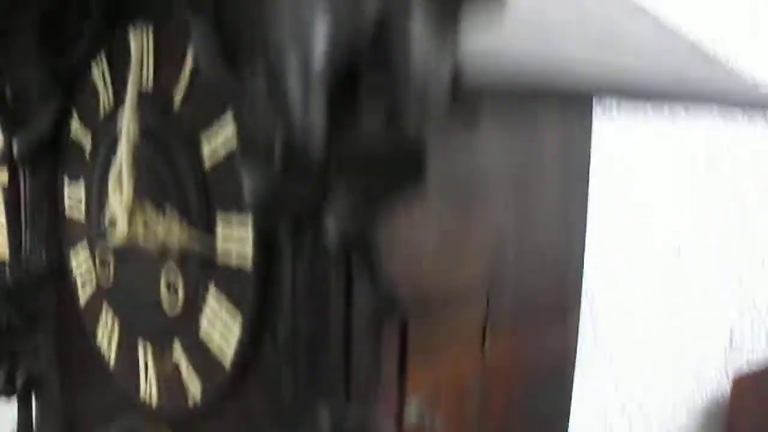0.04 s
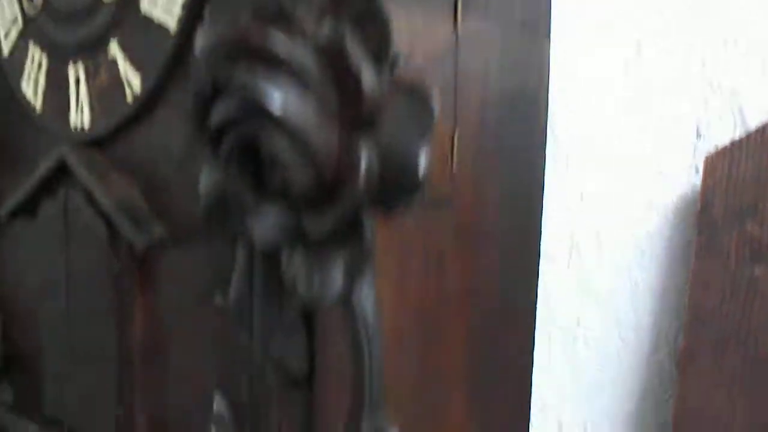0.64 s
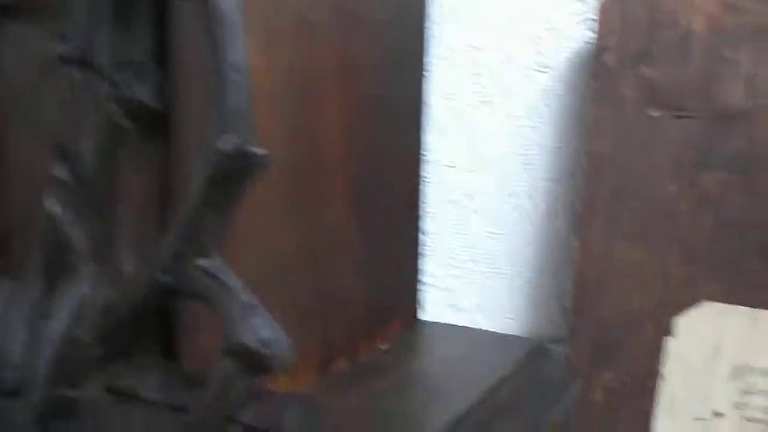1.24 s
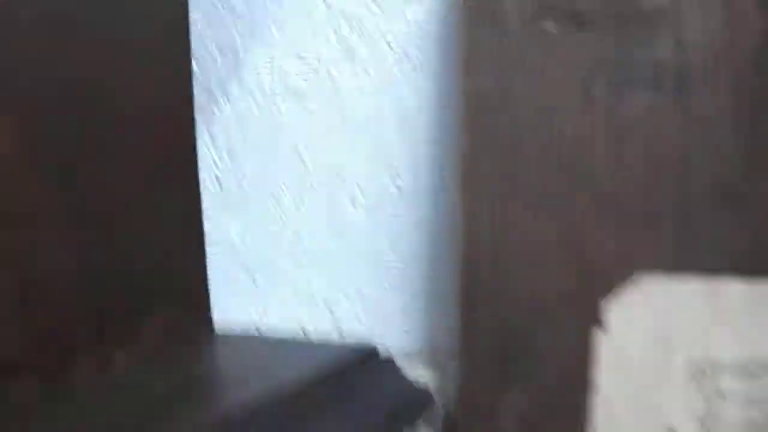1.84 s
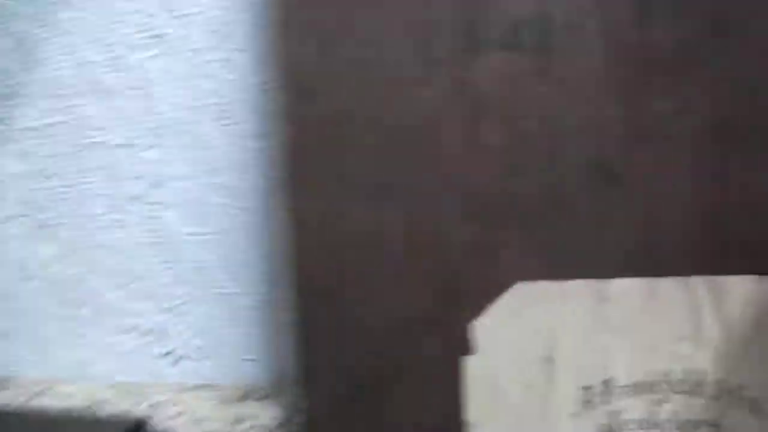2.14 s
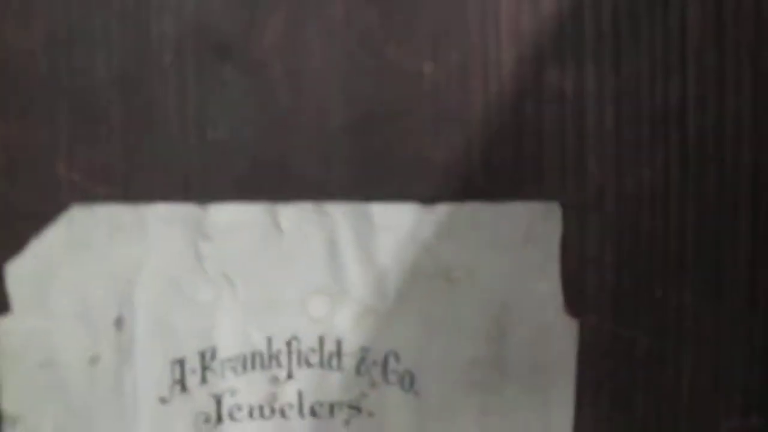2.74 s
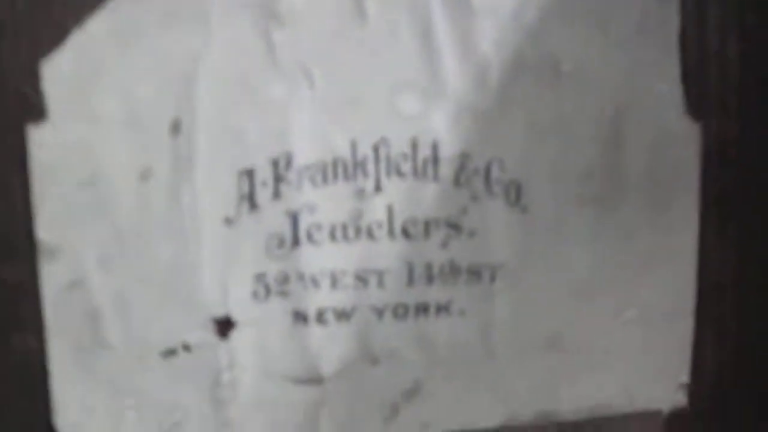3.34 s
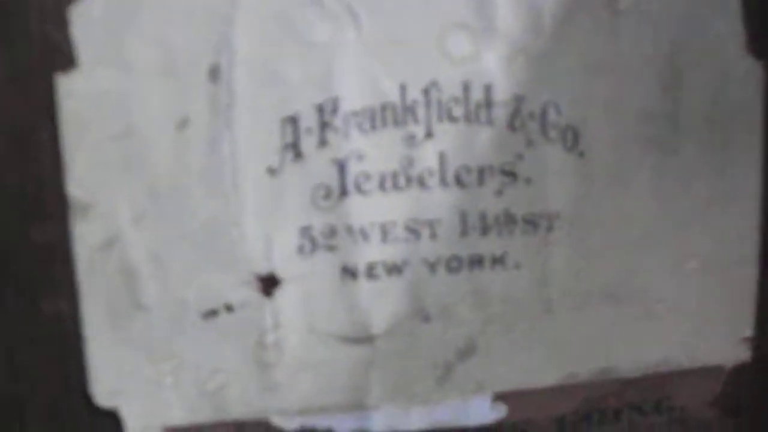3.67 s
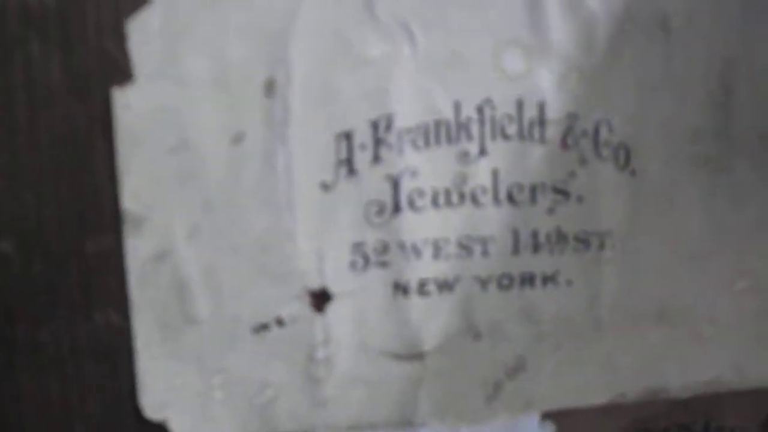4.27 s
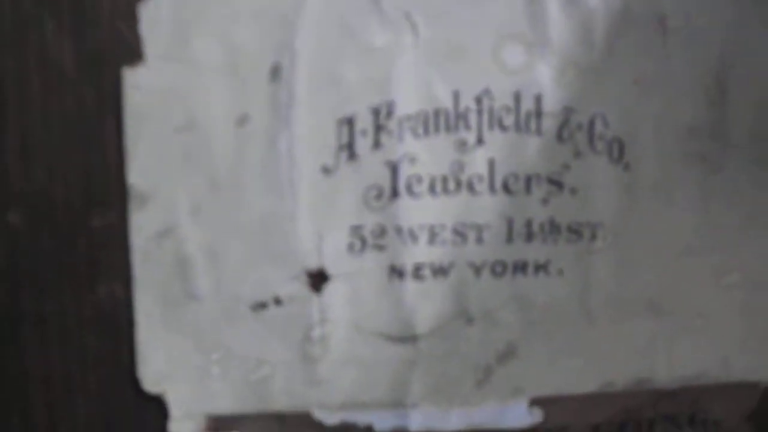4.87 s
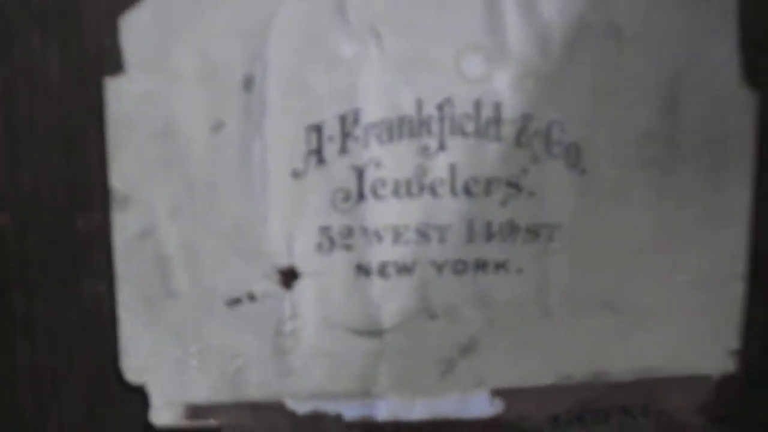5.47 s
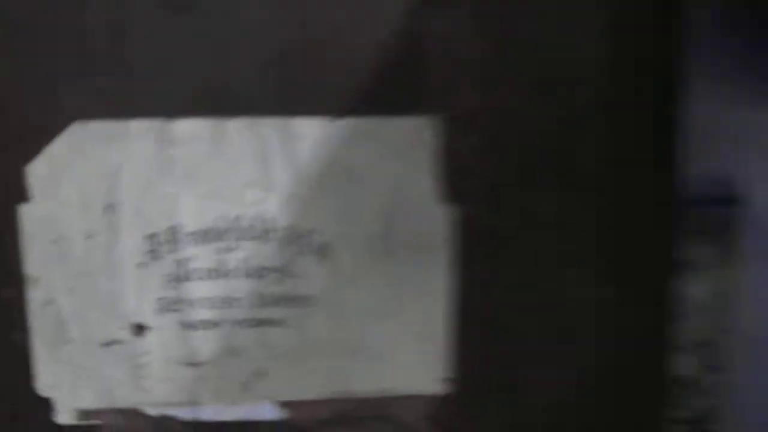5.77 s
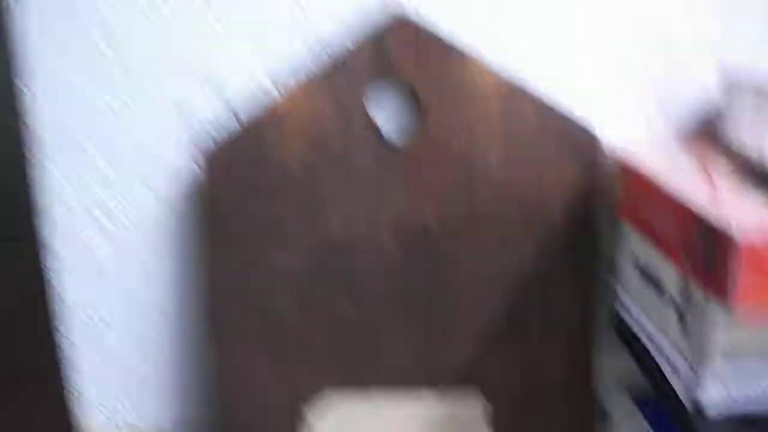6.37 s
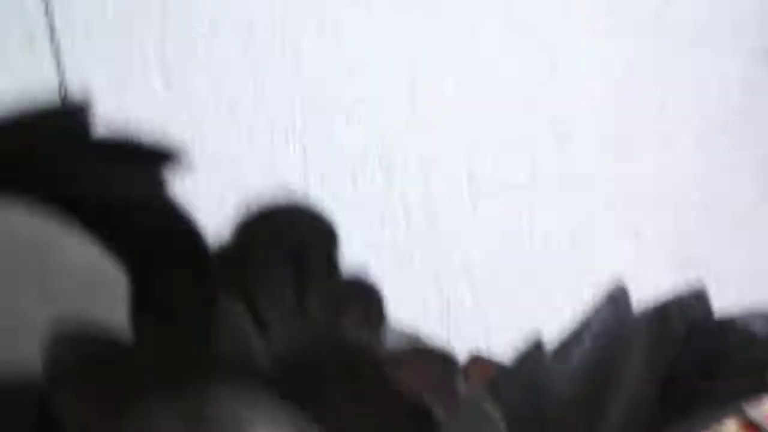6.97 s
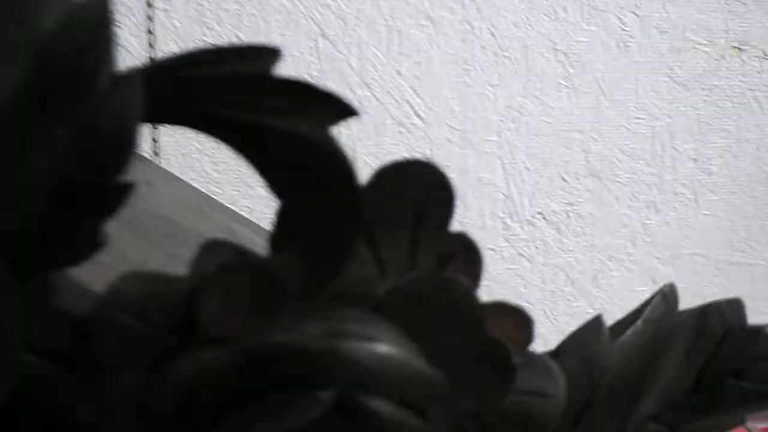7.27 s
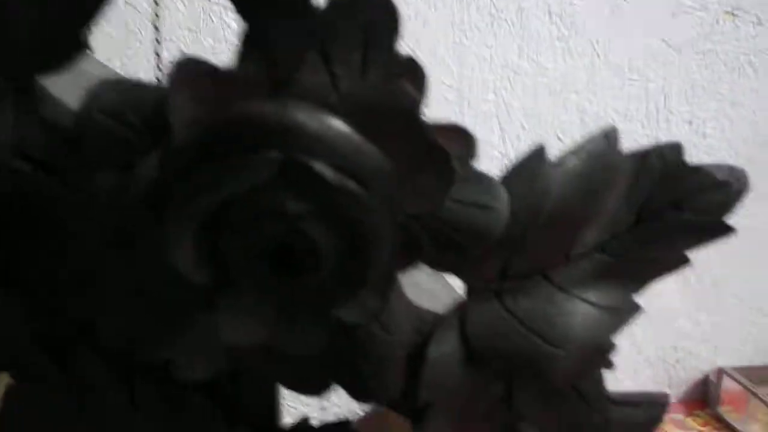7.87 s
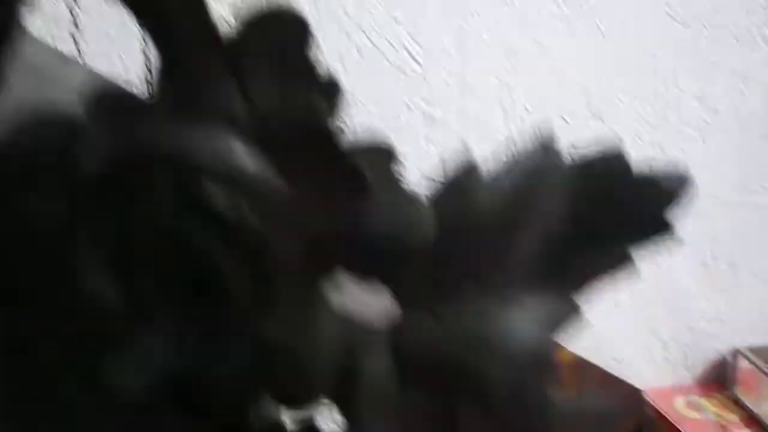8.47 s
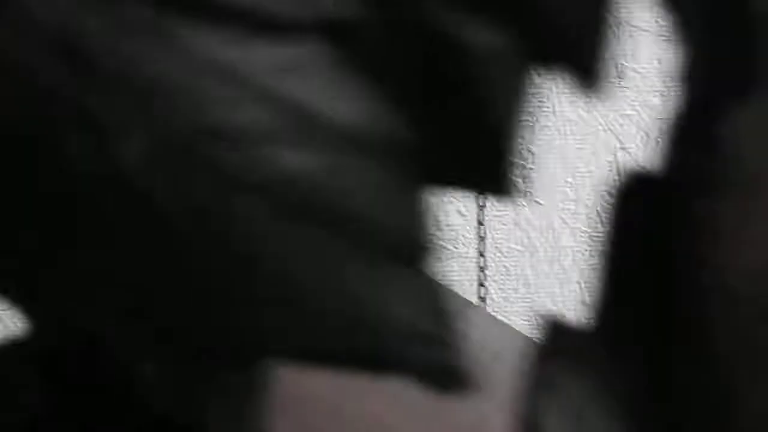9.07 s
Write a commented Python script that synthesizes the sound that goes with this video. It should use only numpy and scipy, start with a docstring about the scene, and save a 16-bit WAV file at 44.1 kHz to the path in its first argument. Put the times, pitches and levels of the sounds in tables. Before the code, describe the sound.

Soft, slightly uneven clock ticking indoors over faint hiss, joined by close finger bumps, creaks and later a brief wooden rattle and snap.

```python
"""A carved wooden wall clock ticks, slightly out of beat, in a small quiet room: its pallets
chatter on the escape wheel and set the plates and case ringing. Someone moves a hand-held camera
around it: fingers bump and tap the housing, the grip creaks, palm and sleeve rustle. Near the end
a small wooden part rattles and a catch snaps shut, ringing out into the room.
Low room rumble, microphone hiss and a faint electrical whine lie underneath."""
import sys
import numpy as np
from scipy import signal
from scipy.fft import rfft, irfft, next_fast_len
from scipy.io import wavfile

SR = 44100
rng = np.random.default_rng(int(sys.argv[2]) if len(sys.argv) > 2 else 0)


def store_wav(level_fs):
    """Save 16-bit WAV to argv[1]."""
    pcm = np.round(np.clip(np.atleast_2d(level_fs), -1, 1) * 32767)
    wavfile.write(sys.argv[1], SR, pcm.T.astype(np.int16))


N = 402191
TIME = np.arange(N) / SR
AGE = np.arange(SR // 2) / SR   # time since a contact [s]


def wall_clock(first_tick_s=0.3988, first_tock_s=0.7588):
    """Two pallets land in turn; the tock comes before the half swing, so the clock limps."""
    # ring of the movement under each pallet (frequency [Hz], level [dB], t60 [s])
    tick_modes = [(650, -8, 0.15), (937, -5, 0.15), (1620, -1, .045), (1896, -2, 0.051),
                  (4350, -7.5, 0.048), (7200, -21, .16)]
    tock_modes = [(929, 3, 0.1), (983, 1.5, 0.13), (2494, 3.5, 0.046), (3060, -9, .07), (3200, -3.5, .06),
                  (5500, -4, 0.04), (7140, -16, .22)]
    # rattle of each pallet on the tooth (frequency [Hz], spectral level [dB])
    tick_colour = [(300, -5), (500, -4), (1200, 0), (1700, 0.5), (2350, -1.5), (2700, -10), (4400, -14.5),
                   (4900, -18), (7400, -13.5), (9000, -22), (14000, -33)]
    tock_colour = [(250, -7), (600, -0.5), (900, -4.5), (1300, -7), (1800, -7.5), (2350, 2.5), (2700, -7),
                   (3100, -2), (3500, -15), (4800, -23), (5400, -5.5), (6200, -15.5), (7700, -10),
                   (9500, -21), (14000, -40)]
    tick_beats = beats(first_tick_s)
    # the tock is a touch softer, with less boom and a steadier ping
    tock_beats = [(s, level_db - 1, boom_db - 4, 0.15 * ping_db - 1)
                  for s, level_db, boom_db, ping_db in beats(first_tock_s)]
    ticks = escapement(tick_beats, tick_modes, tick_colour,
                       slide_s=0.009, rattle_t60=0.088, ring_db=0.5, build_cycles=3.1)
    tocks = escapement(tock_beats, tock_modes, tock_colour,
                       slide_s=0.0067, rattle_t60=0.047, ring_db=-3.5, build_cycles=2.2)
    return ticks + tocks


def beats(first_s, period_s=0.7958):
    """One pallet lands once a pendulum period; its tone shifts as the microphone moves."""
    # perspective on the clock (time [s], level [dB], case boom [dB], plate ping [dB])
    pickup = [(0.4, -44.5, -20, 1), (1.3, -43, -10, -4), (2.8, -46.5, 4, -10), (5.2, -42.5, 3, -6),
              (6.0, -45.5, -7, -12), (6.7, -45.5, -1, 9), (8.6, -45.5, -7, 10)]
    landings = np.arange(first_s, N / SR, period_s)
    when, *columns = np.transpose(pickup)
    return np.transpose([landings] + [np.interp(landings, when, column) for column in columns])


def escapement(landings, pallet_modes, colour, slide_s, rattle_t60, ring_db, build_cycles):
    """The pallet chatters along a tooth for a few ms; plates and case take some cycles to swing up."""
    # boom of the case and ping of the plates (frequency [Hz], level [dB], t60 [s])
    case_modes = [(482.2, 0.5, 0.18), (515, -3, 0.1)]
    plate_modes = [(2308, 4.5, 0.038), (2490, -6, 0.033)]
    out = np.zeros(N)
    attack = 1 - np.exp(-AGE / 0.0002)
    hold_and_decay = np.minimum(1, fade(rattle_t60) * amp(60 * slide_s / rattle_t60))
    for s, level_db, boom_db, ping_db in landings:
        beat = burst(colour, attack * hold_and_decay)
        for modes, part_db in [(pallet_modes, 0), (case_modes, boom_db), (plate_modes, ping_db)]:
            for hz, db, t60 in modes:
                swell = 1 - np.exp(-(AGE / (0.00083 + build_cycles / hz)) ** 2)
                detuned_hz = hz * (1 + 0.0018 * rng.normal())
                swing = np.sin(2 * np.pi * (detuned_hz * AGE + rng.random()))
                beat += amp(db + part_db + ring_db + rng.normal()) * swell * swing * fade(t60)
        add(out, s, amp(level_db) * beat)
    return out


def finger_bumps():
    """Soft fingertips thud on the camera housing, some duller than others."""
    # bumps (time [s], level [dB], brightness corner [Hz])
    bumps = [(0.867, -45.5, 3000), (1.731, -31, 60.4), (1.8451, -31.5, 1500), (1.879, -29, 70),
             (1.972, -30.5, 300), (2.09, -32, 600), (2.117, -35.5, 900), (2.1595, -30, 2000),
             (2.285, -35.5, 220), (5.444, -39.5, 400), (8.653, -44.5, 1500)]
    # low body of the housing (frequency [Hz], level [dB], t60 [s])
    body_modes = [(45, -10, 0.13), (94.5, -15, .12), (166, -12, 0.096), (224, -4, 0.051),
                  (519, -2.5, 0.084), (664, -11.5, 0.048), (980, 0.5, 0.025), (1500, -5.5, .018)]
    out = np.zeros(N)
    for s, level_db, corner_hz in bumps:
        thud = ring(body_modes, scatter_db=1.1)
        add(out, s, amp(level_db) * band_pass(thud, 27, corner_hz, order=1))
    return out


def finger_tap(at_s=1.9722, tap_db=-6.5, buzz_db=-23.5):
    """One hard tap rings the housing and leaves it buzzing briefly."""
    # bright ring of the housing (frequency [Hz], level [dB], t60 [s])
    tap_modes = [(1040, -11, .018), (1280, 3.5, 0.0069), (1502, -6, 0.0094), (2040, -10, 0.0084),
                 (2790, -6.5, 0.0095), (4070, -4.5, 0.004), (5130, -25, 0.0023), (7860, -14, 0.0066),
                 (9400, -21, 0.0045)]
    # its buzz (frequency [Hz], spectral level [dB])
    buzz_colour = [(300, -15), (600, -3), (1100, 0), (2000, -1), (3000, -3), (4400, -13), (6000, -29),
                   (14000, -45)]
    out = np.zeros(N)
    add(out, at_s, -amp(tap_db) * band_pass(ring(tap_modes), 610, 11500))
    add(out, at_s, amp(buzz_db) * burst(buzz_colour, fade(t60=0.027)))
    return out


def grip_creaks():
    """The grip slips on the housing; each creak swells to a peak and dies away."""
    # slips (peak time [s], level [dB], swell [s], t60 [s], tilt [dB/octave])
    creaks = [(1.3508, -30.5, .0002, 0.024, -2.5), (1.384, -24, 0.0053, 0.051, -1.6),
              (1.3923, -31, 0.00056, .012, 4.5), (1.421, -29, 0.0013, 0.023, 1.5),
              (1.438, -38.5, 0.014, 0.12, 2), (6.7784, -33.5, .0003, 0.013, 6.5)]
    # tone of a creak (frequency [Hz], spectral level [dB])
    creak_colour = [(200, -42), (400, -22), (520, 7.5), (660, 5), (800, -8.5), (950, 6), (1100, -3.5),
                    (1300, 0), (1650, -3), (2100, -2.5), (2900, -5.5), (3300, -6), (3700, -9.5),
                    (5500, -16.5), (6900, -15), (14000, -33)]
    out = np.zeros(N)
    for s, level_db, swell_s, t60, tilt_db in creaks:
        swell = np.exp(-np.minimum(AGE[::-1] / swell_s, 20))
        envelope = np.concatenate([swell, fade(t60)])
        add(out, s - AGE[-1], amp(level_db) * burst(creak_colour, envelope, tilt_db))
    return out


def rattle_and_snap():
    """A small wooden part rattles across the room, then a catch snaps shut; both ring for mere ms."""
    # contacts (time [s], level [dB], low cut [Hz], high cut [Hz])
    rattle = [(7.891, -26, 945, 8000), (7.912, -17.5, 470, 7100), (7.920, -31, 500, 6000),
              (7.9365, -18.5, 500, 3800), (7.9455, -21, 397, 4200), (8.097, -36.5, 3480, 8000),
              (8.151, -39, 2500, 5500)]
    snap = [(8.1781, -29, 1500, 7000), (8.1791, -23, 1500, 6000), (8.1802, -12.5, 800, 5560)]
    # ring of the wood and of the catch (frequency [Hz], level [dB], t60 [s])
    wood_modes = [(525, -9.5, 0.0083), (945, -3, 0.0083), (1204, -7, 0.0082), (2210, -3.5, 0.0045),
                  (3010, -1, 0.0051), (3900, -6.5, 0.0043), (4850, -4, 0.0042), (7500, 2, 0.0014)]
    catch_modes = [(890, -12.5, 0.011), (1210, -11.5, 0.0084), (1760, -8.5, 0.0054), (2480, -3, 0.005),
                   (3100, -3.5, 0.0058), (3680, -5.5, 0.0037), (5050, -8, 0.0026), (7360, -1.5, 0.0019),
                   (9300, -8, 0.002)]
    out = np.zeros(N)
    for contacts, modes in [(rattle, wood_modes), (snap, catch_modes)]:
        for s, level_db, low_hz, high_hz in contacts:
            click = ring(modes, scatter_db=1.14, alternate=True)
            add(out, s, amp(level_db) * band_pass(click, low_hz, high_hz))
    return out


def rubbing(grain_db=2.0, cuff_db=2.5, cuff_loss_db_per_s=120):
    """Skin and cloth catch and slip unevenly; quick palm strokes drag the cuff most and are brightest."""
    # palm shifts, sleeve slides and a faint squeak (centre time [s], length [s], level [dB])
    palm_strokes = [(1.779, 0.1, -48), (2.1, 0.58, -55.5), (2.527, 0.065, -46.5), (2.605, 0.036, -52),
                    (2.678, 0.053, -46.5), (5.887, 0.043, -51.5), (6.005, 0.1, -55), (6.353, 0.062, -51),
                    (6.687, 0.12, -58), (8.753, 0.14, -56)]
    sleeve_strokes = [(2.21, 0.48, -55), (2.852, 0.053, -53.5), (6.56, 0.25, -57), (6.7, 0.057, -53)]
    squeaks = [(8.57, 0.13, -61.5)]
    # dull skin, airy cloth and the squeak's narrow resonance (frequency [Hz], spectral level [dB])
    palm_colour = [(200, -19), (420, -10), (515, 6.5), (575, -3), (640, -0.5), (780, -3), (1000, -2.5),
                   (1500, -10.5), (3000, -11.5), (8000, -36)]
    sleeve_colour = [(700, -33), (1800, -3), (2900, -0.5), (3700, -2.5), (4100, 0.5), (4380, 5),
                     (4650, -2.5), (7000, -5.5), (10000, -8), (15000, -20)]
    squeak_colour = [(1400, -40), (1570, -4), (1750, -34)]
    cuff_strokes = [(s, length_s, db + cuff_db - cuff_loss_db_per_s * length_s)
                    for s, length_s, db in palm_strokes]
    grain = amp(grain_db * noise([(30, 2.0), (200, -9.0), (1000, -43)], N))   # fast level flutter
    palm = strokes(palm_strokes) * noise(palm_colour, N)
    sleeve = (strokes(sleeve_strokes) + strokes(cuff_strokes)) * noise(sleeve_colour, N)
    squeak = strokes(squeaks) * noise(squeak_colour, N)
    return grain * (palm + sleeve + squeak)


def room_reverb(send, onset_s=0.0014):
    """Dense wall reflections, the top treble dying first."""
    # decay of the room (frequency [Hz], t60 [s])
    room_t60 = [(200, 0.48), (1000, 0.47), (3000, 0.34), (6000, 0.41), (12000, .18)]
    edges_hz = np.geomspace(150, 15000, 11)
    tail = np.zeros(len(AGE))
    for low, high in zip(edges_hz, edges_hz[1:]):
        t60 = at_hz(room_t60, np.sqrt(low * high))
        tail += band_pass(rng.standard_normal(len(AGE)), low, high) * fade(t60)
    tail *= 1 - np.exp(-(AGE / onset_s) ** 2)
    return signal.fftconvolve(send, tail / np.sqrt(np.sum(tail ** 2)))[:N]


def room_tone(rumble_db=-56.0):
    """Steady rumble, and a hollow murmur of the room that gathers near the boards."""
    # tone of the rumble and of the murmur (frequency [Hz], spectral level [dB])
    rumble_colour = [(12, -16), (20, 0.5), (48, -4), (70, -2), (113, -3.5), (131, -6.5), (151, -11.5),
                     (221, -6.5), (251, -10), (306, -13.5), (394, -13.5), (812, -16.5), (888, -14),
                     (1500, -24.5), (1950, -36), (3300, -120)]
    murmur_colour = [(100, 3), (190, 11), (270, 5), (305, 11), (350, -1), (440, 3.5), (600, -16.5),
                     (850, -37), (935, -19), (1050, -38)]
    # rise and fall of the murmur (time [s], level [dB])
    murmur_ride = [(0, -68), (2, -62), (3.2, -60.5), (4.2, -59.5), (5.4, -60.5), (6.3, -66), (7, -72),
                   (9.1, -71)]
    murmur = amp(np.interp(TIME, *np.transpose(murmur_ride))) * noise(murmur_colour, N)
    return murmur + amp(rumble_db) * noise(rumble_colour, N)


def electrical_whine():
    """A faint, steady hum and a few thin high tones."""
    # electrical tones (frequency [Hz], rms level [dB])
    tones = [(118.4, -73.5), (7558, -80), (9453, -88), (9523, -77), (9598, -84)]
    return sum(amp(db) * np.sqrt(2) * np.sin(2 * np.pi * hz * TIME) for hz, db in tones)


def microphone_hiss(shared_db=-53.5, channel_db=-65):
    """One microphone hisses into both channels; each adds a fainter treble hiss of its own."""
    # tone of the hiss (frequency [Hz], spectral level [dB])
    hiss_colour = [(300, -24), (1200, -8), (2000, -5), (4000, -7.5), (6700, -8.5), (7500, -5.5),
                   (8400, -8.5), (10800, -3.5), (12400, 5), (13600, -2.5), (15700, -11)]
    shared = noise(hiss_colour, N)
    channels = np.array([noise(hiss_colour, N), noise(hiss_colour, N)])
    return amp(shared_db) * shared + amp(channel_db) * band_pass(channels, 4500, 16400)


def ring(modes, scatter_db=0, alternate=False):
    """Struck modes whose strength can vary from blow to blow; neighbours may swing in opposition."""
    polarity = -1 if alternate else 1
    out = np.zeros(len(AGE))
    for k, (hz, db, t60) in enumerate(modes):
        gain = polarity ** k * amp(db + scatter_db * rng.normal())
        out += gain * np.sin(2 * np.pi * hz * AGE) * fade(t60)
    return out


def burst(colour, envelope, tilt_db=0):
    """Coloured noise, tilted per octave, under an envelope that sets its energy."""
    tilted = [(hz, db + tilt_db * np.log2(hz)) for hz, db in colour]
    x = envelope * noise(tilted, len(envelope))
    return x * np.sqrt(np.sum(envelope ** 2) / np.sum(x ** 2))


def noise(colour, size):
    """Noise of a given spectrum, rms 1."""
    padded = next_fast_len(size)
    gains = amp(at_hz(colour, np.fft.rfftfreq(padded, 1 / SR)))
    x = irfft(rfft(rng.standard_normal(padded)) * gains, padded)[:size]
    return x / x.std()


def strokes(rows):
    """Flat-topped envelopes: each stroke swells, holds and dies away symmetrically."""
    return sum(amp(db) * np.exp(-np.minimum((2 * (TIME - s) / length_s) ** 4 / 2, 20))
               for s, length_s, db in rows)


def fade(t60):
    """Exponential decay, 60 dB down after t60 seconds."""
    return np.exp(-np.log(1000) * np.minimum(AGE / t60, 10))


def band_pass(x, low_hz, high_hz, order=2):
    """Keep what lies between two edges."""
    return signal.sosfilt(signal.butter(order, [low_hz, high_hz], "band", fs=SR, output="sos"), x)


def at_hz(points, hz):
    """Read a table on a log-frequency axis."""
    table_hz, values = np.transpose(points)
    return np.interp(np.log(hz + 1e-9), np.log(table_hz), values)


def amp(db):
    """Decibels to gain."""
    return 10 ** (np.asarray(db) / 20)


def add(track, s, sound):
    """Mix a sound in at a given time."""
    start = max(round(s * SR), 0)
    track[start:start + len(sound)] += sound[:N - start]


def scene(clock_send_db=-12, click_send_db=-1.5, hand_send_db=-37.0):
    """The clock is close and fairly dry, the clicks are roomy, the handling is almost bone dry."""
    clock = wall_clock()
    hand = finger_bumps() + finger_tap() + grip_creaks()
    clicks = rattle_and_snap()
    send = amp(clock_send_db) * clock + amp(click_send_db) * clicks + amp(hand_send_db) * hand
    mono = clock + hand + clicks + room_reverb(send) + rubbing() + room_tone() + electrical_whine()
    return mono + microphone_hiss()


def record(dry, cutoff_hz=15800):
    """The left channel runs one sample late; a steep low-pass cuts the top."""
    late_left = np.concatenate([[0], dry[0, :-1]])
    high_cut = signal.ellip(10, .1, 80, cutoff_hz, fs=SR, output="sos")
    return signal.sosfilt(high_cut, np.array([late_left, dry[1]]))


dry = scene()
out = record(dry)
store_wav(out)
```